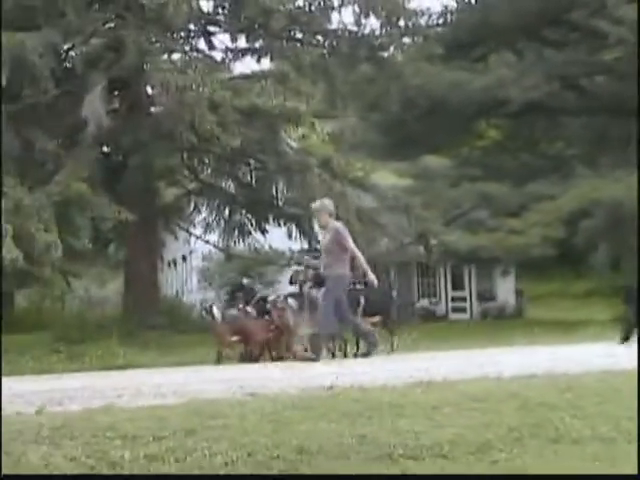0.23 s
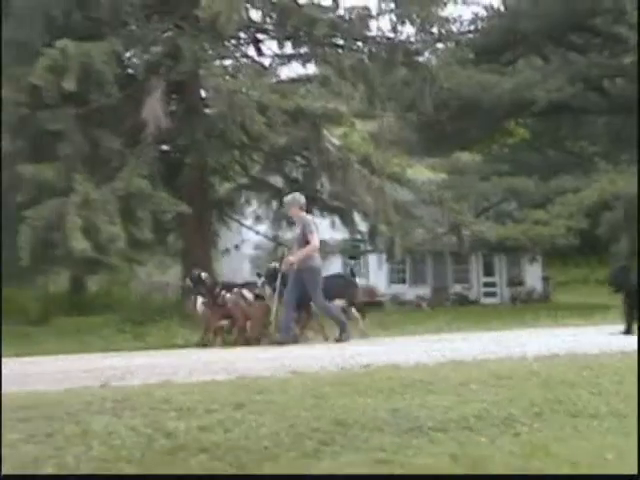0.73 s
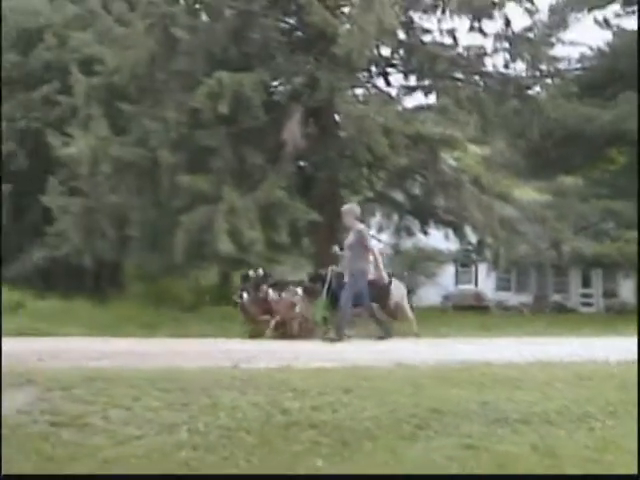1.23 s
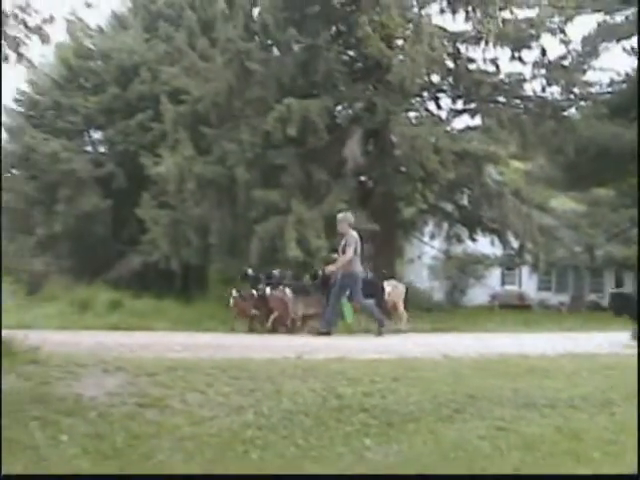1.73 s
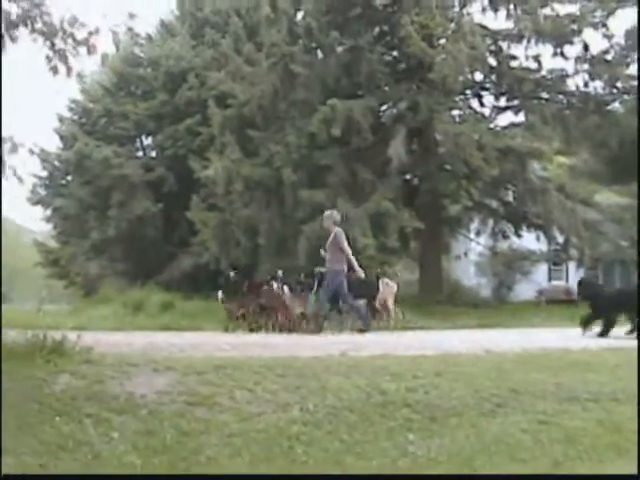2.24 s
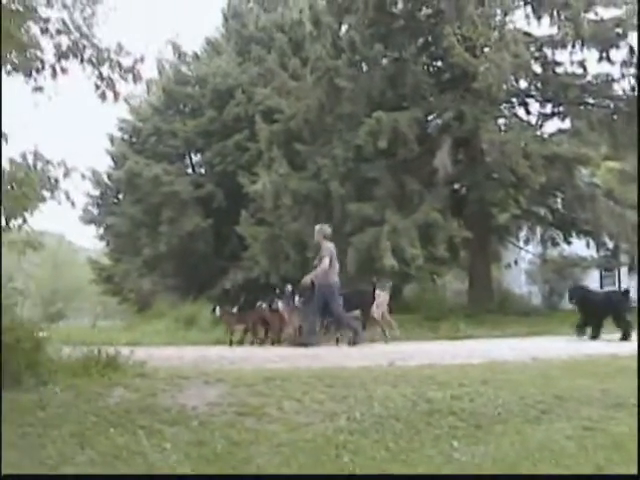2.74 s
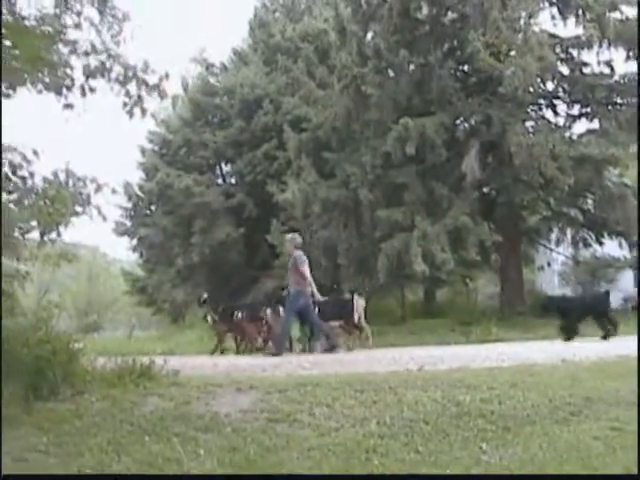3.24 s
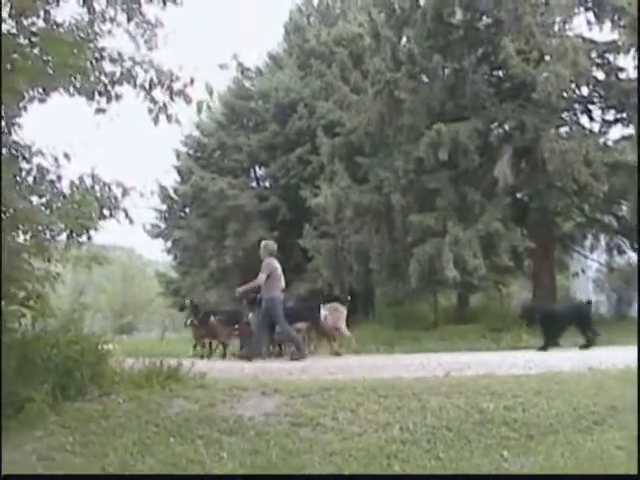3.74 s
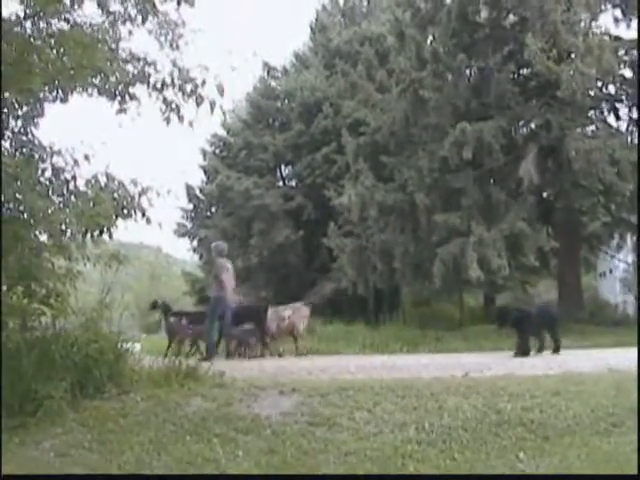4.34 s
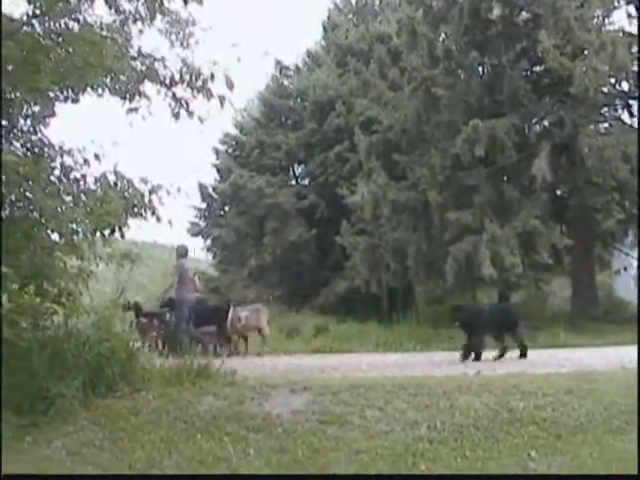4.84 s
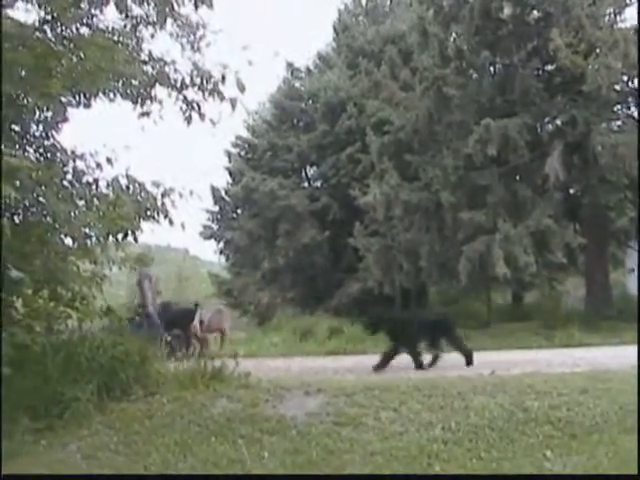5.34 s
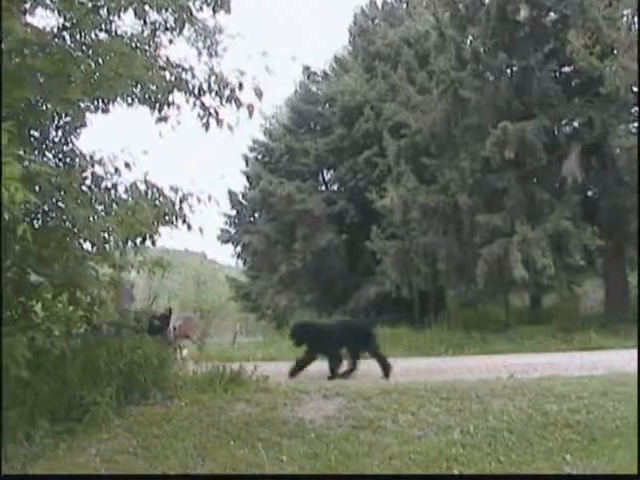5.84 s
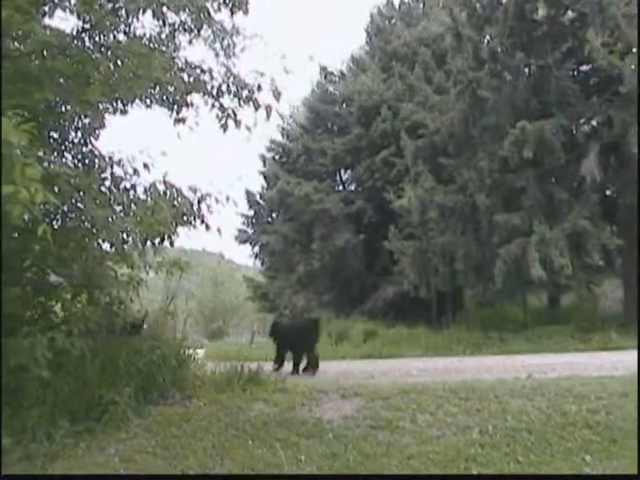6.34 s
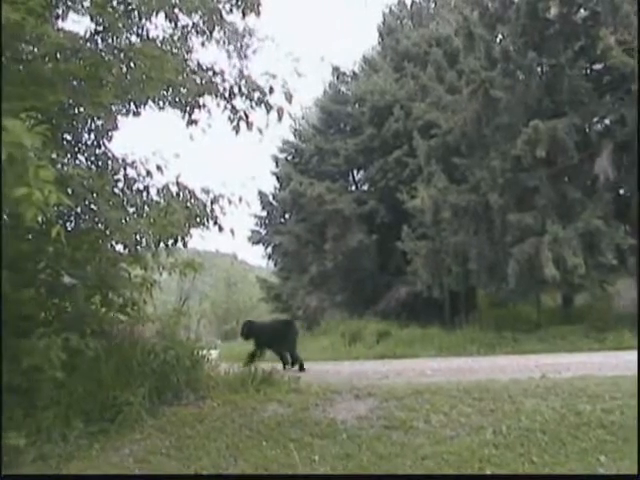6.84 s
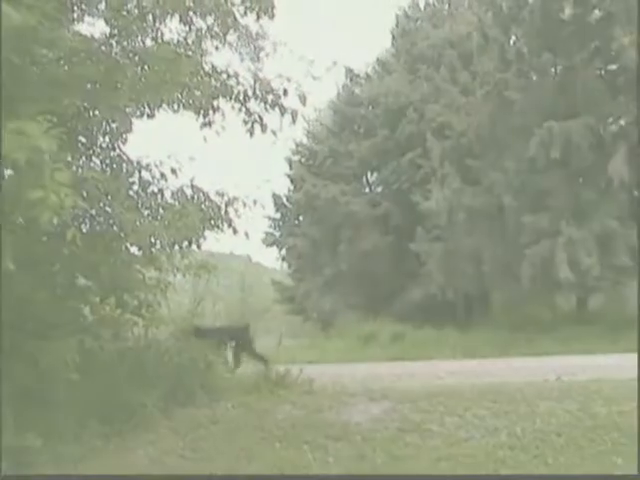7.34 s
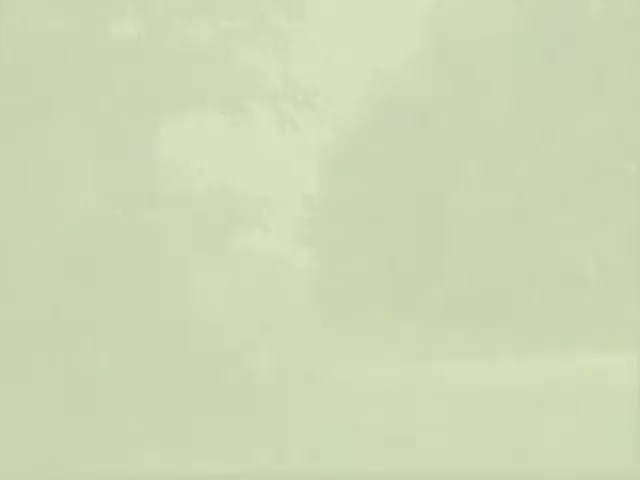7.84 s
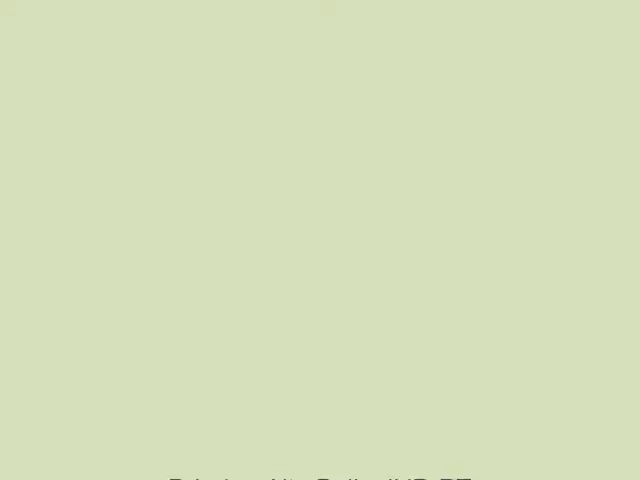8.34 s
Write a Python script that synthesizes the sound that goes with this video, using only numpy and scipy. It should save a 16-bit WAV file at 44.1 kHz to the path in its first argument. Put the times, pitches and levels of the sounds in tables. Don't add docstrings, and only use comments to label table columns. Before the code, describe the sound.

Small neck bells jingle and clank unevenly as a goat herd walks a gravel drive outdoors, with crunching steps, bird whistles and camera creaks.

```python
import sys
import numpy as np
from scipy import signal
from scipy.fft import rfft, irfft, next_fast_len
from scipy.io import wavfile
from scipy.ndimage import uniform_filter1d

SR = 44100
rng = np.random.default_rng(int(sys.argv[2]) if len(sys.argv) > 2 else 0)


def voltage_ratio(level):
    return 10 ** (np.asarray(level, float) / 20)


def dump(signal):
    limited = np.clip(np.atleast_2d(signal).T, -1, 1)
    pcm = np.round(limited * 32767).astype(np.int16)
    wavfile.write(sys.argv[1], SR, pcm)


N = 378800


def evened(x):
    return x / np.sqrt(np.mean(x ** 2) + 1e-20)


def read(points, hz):
    f, value = np.transpose(points)
    return np.interp(np.log(hz + 1), np.log(f + 1), value)


def follow(rows):
    return voltage_ratio(np.interp(np.arange(N) / SR, *np.transpose(rows)))


def surges(rows, rise_s):
    s, db, fade_s = np.transpose(rows)[:, :, None]
    t = np.arange(0, N, 64) / SR
    level_db = db - 20 * np.maximum((s - t) / rise_s, (t - s) / fade_s)
    return np.interp(np.arange(N) / SR, t, np.sqrt((voltage_ratio(level_db) ** 2).sum(0)))


def add(mix, s, sound):
    part = mix[round(s * SR):][:len(sound)]
    part += sound[:len(part)]


def ring(t, hz, t60, phase=0):
    return np.exp(-np.log(1000) / t60 * t) * np.sin(2 * np.pi * (hz * t + phase))


def onset(t, rise_s):
    return 1 - np.exp(-t / rise_s)


def hiss(points, likeness, patchy_db):
    hz = np.fft.rfftfreq(1024, 1 / SR)
    a, b, c, d, patches = rng.standard_normal((N // 256 + 5, 513, 5)).T
    patches = uniform_filter1d(uniform_filter1d(patches, size=12, axis=0), size=12, axis=1)
    same = np.clip(likeness(hz), -1, 1)[:, None]
    left = a + 1j * b
    right = same * left + np.sqrt(1 - same ** 2) * (c + 1j * d)
    z = np.array([left, right]) * voltage_ratio(read(points, hz)[:, None] + patchy_db * evened(patches))
    return evened(signal.istft(z, nperseg=1024, noverlap=768)[1][:, :N])


# (time [s], level [dB])
RUMBLE_LEVEL = [(0.0, -50.5), (0.18, -57), (0.52, -58), (1.1, -56), (2.37, -57.5), (2.76, -64.5),
                (3.42, -60), (4.09, -64), (4.28, -62.5), (6.11, -59.5), (7.04, -62.5), (7.89, -59)]
# (centre [Hz], width [Hz], level [dB])
RUMBLE_HUMPS = [(60.6, 92, -12.5), (148, 44, 4), (277, 52, 1), (423, 140, -9)]


def rumble():
    hz = np.geomspace(15, 3000, num=60)
    humps = sum(voltage_ratio(db) / (1 + (2 * (hz - f) / width) ** 2) for f, width, db in RUMBLE_HUMPS)
    colour = np.c_[hz, 20 * np.log10(humps)]
    return follow(RUMBLE_LEVEL) * hiss(colour, lambda f: .97 - 9.0 / (f + 10), patchy_db=2.5)


# (frequency [Hz], level per Hz [dB])
AIR_COLOUR = [(15, -52), (25, -21.5), (135, -5.5), (205, -20.5), (464, -7.5), (544, -9.5), (1780, -13.5),
              (2080, -10), (2710, -11), (3620, -16.5), (4350, -18), (11800, -35.5), (13500, -56.5)]
# (frequency [Hz], likeness [0-1])
AIR_LIKENESS = [(60, 1), (230, 0.6), (910, 0.82), (3520, 0.9), (13700, 0.74)]


def air():
    return voltage_ratio(-58) * hiss(AIR_COLOUR, lambda hz: read(AIR_LIKENESS, hz), patchy_db=3.3)


# (frequency [Hz], level [dB])
WHINE_COLOUR = [(300, -84.5), (1500, -77.5), (1800, -76.5), (3000, -81.5), (4500, -76), (6000, -78.5),
                (7000, -84), (10500, -125)]


def whine(drum_hz=299.67):
    turn = np.linspace(0, 1, num=4097)
    shape = np.zeros(len(turn))
    for k in range(1, 36):
        shape += voltage_ratio(read(WHINE_COLOUR, k * drum_hz) + 0.5) * np.sin(2 * np.pi * (k * turn + rng.random()))
    return np.interp(np.arange(N) / SR * drum_hz % 1, turn, shape)


def trees(x, t60=.4):
    taps = np.zeros((2, SR // 2))
    slots = np.arange(200, SR // 2 - 20, 20)
    at = slots + rng.integers(0, 20, (2, len(slots)))
    np.put_along_axis(taps, at, rng.choice([-1., 1.], at.shape), 1)
    taps = taps * voltage_ratio(-60 * np.arange(SR // 2) / SR / t60)
    return signal.fftconvolve(x[None], taps / np.linalg.norm(taps[0]), axes=1)[:, :N]


# (time [s], peak level [dB], pitch [Hz])
CREAKS = [(0.002, -41, 700), (0.245, -43, 807), (0.264, -38.5, 860), (0.282, -44, 935), (0.375, -31.5, 926),
          (0.38, -35, 775), (0.424, -28, 776), (0.502, -37, 755), (1.1155, -41, 300), (1.117, -30, 700),
          (1.146, -36, 800), (2.127, -32, 790), (2.161, -28.5, 764), (2.175, -33.5, 820),
          (2.208, -35.5, 810), (2.216, -30.5, 825), (2.232, -33.5, 790), (2.905, -46, 905),
          (2.976, -45, 680), (3.544, -40.5, 854), (3.973, -46.5, 920), (4.817, -46.5, 845),
          (4.958, -36, 1006), (5.105, -35, 1600), (5.13, -41.5, 1090), (5.237, -44, 1090), (5.66, -45, 720),
          (6.557, -44.5, 797), (7.6435, -29, 1750)]


def creaks():
    out, t = np.zeros(N), np.arange(2000) / SR
    for (s, db, hz), d in zip(CREAKS, rng.standard_normal((len(CREAKS), 2))):
        upper = .6 * ring(t, 1550 * (1 + .1 * d[0]), .016) + .45 * ring(t, 1150, .014, d[1])
        knock = ring(t, hz, 20 / hz) + min(hz / 800, 1) ** 3 * upper
        snap = uniform_filter1d(rng.standard_normal(len(t)), size=5) * voltage_ratio(-60 * t / 0.016)
        snap = snap - uniform_filter1d(snap, size=40)
        slip = min(1000 / hz, 1) ** 1.3 * knock + .6 * (hz / 1000) ** 2.1 * snap
        add(out, s + 0.0013, voltage_ratio(db + 1) * slip * onset(t, 0.00034))
    return out


# (start [s], length [s], from [Hz], to [Hz], level [dB])
CHIRPS = [(.425, .04, 4300, 3750, -59), (1.678, 0.072, 5900, 3840, -59), (3.404, 0.046, 3830, 6600, -54),
          (3.565, 0.069, 3800, 7200, -52), (3.753, 0.063, 3860, 7300, -53), (3.944, 0.054, 3750, 7330, -50),
          (4.131, 0.045, 4300, 6480, -49), (4.314, 0.049, 4400, 6280, -57), (4.918, 0.055, 5000, 4100, -55),
          (5.2, 0.025, 4200, 4800, -55), (5.222, .02, 4800, 4400, -57), (.51, .05, 2900, 3350, -60),
          (5.316, 0.089, 5700, 3840, -57), (5.405, .05, 3800, 2900, -60), (5.514, 0.027, 3350, 2710, -59),
          (5.575, 0.042, 3000, 4850, -59), (5.612, .012, 4850, 4450, -60), (5.62, .025, 2950, 3200, -60),
          (5.645, .035, 3850, 4850, -57), (5.675, .012, 4850, 4600, -59), (5.801, 0.045, 4950, 4100, -55),
          (5.845, 0.045, 3900, 2910, -59), (5.882, 0.09, 5800, 5250, -62), (6.075, 0.072, 2700, 3060, -49),
          (6.301, 0.079, 2700, 2250, -57), (7.827, .03, 5500, 6600, -66)]


def birds():
    out = np.zeros(N)
    for s, length, from_hz, to_hz, db in CHIRPS:
        hz = to_hz + (from_hz - to_hz) * np.linspace(1, 0, round(length * SR)) ** 1.25
        whistle = np.sin(2 * np.pi * np.cumsum(hz) / SR) * signal.windows.tukey(len(hz), .35)
        add(out, s, voltage_ratio(db) * (hz.min() / hz) ** 1.1 * whistle)
    flutter = evened(uniform_filter1d(rng.standard_normal(N), size=150))
    return out * (1 + 0.3 * flutter)


# (time [s], peak level [dB])
STONES = [(0.3292, -46), (0.63, -41), (0.8579, -46.5), (0.967, -42), (1.1165, -35), (1.13, -31),
          (1.1425, -24), (1.153, -29), (1.1625, -24), (1.177, -32), (1.197, -32), (1.207, -31),
          (1.215, -29), (1.254, -31), (1.268, -29), (1.29, -35), (1.3263, -46), (1.6122, -44), (2.008, -47),
          (2.3416, -45), (2.3611, -43), (2.4025, -45), (2.5212, -40), (2.682, -37), (2.742, -40),
          (2.76, -41), (2.775, -42), (2.865, -44), (2.98, -40), (3.0102, -34), (3.022, -34), (3.0596, -35),
          (3.068, -36), (3.174, -26), (3.19, -29), (3.225, -32), (3.245, -33), (3.74, -40), (4.16, -36),
          (4.205, -35), (4.32, -39), (4.425, -42), (4.835, -42), (3.683, -37.5), (4.151, -37),
          (4.1914, -34), (4.925, -43), (4.955, -43), (5.025, -45), (5.106, -45), (5.135, -43), (5.47, -50),
          (5.999, -42.5), (6.39, -53.5), (6.7027, -41), (6.7127, -33), (6.76, -42), (6.8414, -39),
          (6.9082, -44), (6.9586, -40), (6.9886, -40), (7.02, -42), (7.055, -39), (7.1208, -43),
          (7.175, -47), (7.645, -52)]


def turning_stones(t60=0.04):
    out, t = np.zeros(N), np.arange(SR // 4) / SR
    for s, db in STONES:
        add(out, s, voltage_ratio(db - 7.5 - 60 * t / t60) * onset(t, 0.0015))
    return out


# (time [s], level [dB], time to fade by 20 dB [s])
STEPS = [(.03, -62.5, 0.5), (.33, -61, 0.3), (.645, -57, .2), (.86, -62, 0.2), (.97, -61, 0.1),
         (1.16, -44, 0.2), (1.21, -45, .2), (1.28, -47, 0.06), (1.4, -71, 0.25), (1.62, -58.5, 0.1),
         (1.76, -62, 0.37), (2.03, -62, 0.2), (2.3, -58, 0.75), (2.64, -60, 0.6), (2.74, -54, 0.22),
         (2.92, -56, 0.5), (3.0, -54, 0.25), (3.18, -43, 0.26), (3.6, -60, .4), (3.72, -54, .13),
         (3.94, -64, 0.1), (4.14, -55, 0.4), (4.31, -53, .08), (4.41, -57, 0.18), (4.545, -58, .2),
         (4.83, -58, .1), (4.94, -58.5, .14), (5.135, -55, .25), (5.8, -70, 1.9), (6.71, -57.5, 0.7),
         (6.97, -55, 0.3), (7.03, -56, .15), (7.13, -60, .15), (7.67, -62, .2), (7.9, -64, .2)]
# (frequency [Hz], level per Hz [dB])
SCUFF_COLOUR = [(530, -39.5), (900, -21), (1990, -20.5), (2700, -12.5), (3670, -15), (4110, -14),
                (7750, -9.5), (10000, -13), (12300, -21), (13500, -31)]


def gravel(per_s=900, wash=0.8, lift_db=4, step_rise_s=.03, floor_db=-83.5):
    grains = voltage_ratio(3.0 * np.minimum(rng.exponential(1, N), 5)) * (rng.random(N) < per_s / SR)
    grains = signal.oaconvolve(grains, np.exp(-np.arange(200) / 100.0))[:N]
    grit = evened(wash + evened(grains))
    scuff = grit * (surges(STEPS, step_rise_s) + voltage_ratio(floor_db))
    noise = hiss(SCUFF_COLOUR, lambda hz: 0.9 + 0 * hz, patchy_db=1.5)
    return voltage_ratio(lift_db) * noise * np.hypot(scuff, turning_stones())


# (time [s], peak level [dB], pitch [Hz])
SLIT_BLOWS = [(0.6404, -43, 3430), (0.7791, -50, 3450), (0.9657, -45, 3460), (1.0294, -54, 3420),
              (2.3161, -44, 3430), (2.5132, -53, 3490), (2.6703, -47, 3430), (2.9262, -54, 3420),
              (3.5563, -50, 3430), (4.3121, -55, 3480), (4.5336, -57, 3440), (5.1332, -53, 3410),
              (6.6308, -56, 3490), (7.4175, -54, 3420)]


def slit_rings():
    out, t = np.zeros(N), np.arange(SR // 5) / SR
    for s, db, hz in SLIT_BLOWS:
        add(out, s, voltage_ratio(db + 1) * ring(t, hz, .35) * onset(t, .004))
    return out


# (time [s], peak level [dB])
RIM_BLOWS = [(0.0478, -50), (0.1136, -60), (0.2977, -52), (0.9852, -42), (1.1109, -50), (2.7272, -47),
             (3.1742, -44), (4.2009, -52)]


def rim_flares():
    out, t = np.zeros(N), np.arange(SR // 5) / SR
    flare = (ring(t, 13440, .06) + .5 * ring(t, 13700, .05)) * onset(t, .003)
    for s, db in RIM_BLOWS:
        add(out, s, voltage_ratio(db + 1) * flare)
    return out


# (time [s], peak level [dB])
CLATTER = [(.63, -30), (.648, -31), (.857, -32), (.89, -36), (3.96, -38), (4.42, -36), (4.59, -37),
           (5.21, -36), (2.296, -31), (2.383, -38), (2.87, -39), (3.472, -40), (4.66, -36), (4.815, -39),
           (5.25, -37), (5.919, -37), (6.185, -40), (6.454, -41)]


def clatter(spread_hz=170, t60=.04, gap_s=.008, step_db=-1.5):
    out, t = np.zeros(N), np.arange(3000) / SR
    for (s, db), d in zip(CLATTER, rng.standard_normal((len(CLATTER), 5, 2))):
        for k, (off, late) in enumerate(d):
            clink = ring(t, 2720 + spread_hz * off, t60) * onset(t, .001)
            add(out, s + gap_s * k * (1 + .2 * np.tanh(late)), voltage_ratio(db + step_db * k) * clink)
    return out


# (frequency [Hz], t60 [s])
SIDE_MODE = (3445, 0.36)
# (frequency [Hz], level [dB], t60 [s])
SHELL = [(6650, -4, .2), (7700, -2, .28), (7755, -3, .2), (12150, -11, .15), (12470, 1.5, .12),
         (12540, -1, .1), (12820, -6, .14), (13420, -13, .06)]
HERD_HZ = [2625, 2665, 2695, 2740, 2750, 2775, 2810]
# (time [s], level [dB], time to fade by 20 dB [s])
JOLTS = [(0.07, -39, .3), (.37, -36.5, 0.22), (.64, -39.5, .5), (.87, -41.5, .3), (1.0, -38, .5),
         (1.48, -45, 0.3), (1.78, -45, .37), (2.03, -45, 0.5), (2.34, -31, .13), (2.56, -46.5, 0.1),
         (2.69, -45.5, .23), (2.89, -39, 0.87), (3.47, -47.5, 1.1), (3.76, -46, 0.3), (3.93, -43, .15),
         (4.13, -42, .4), (4.25, -38, 0.13), (4.4, -45, .9), (4.94, -50.5, 0.5), (5.2, -38, .22),
         (5.96, -54.5, 1.6), (6.22, -55, 1.2), (6.47, -45.5, 0.1), (6.65, -47, 1.05), (7.02, -51, 1.5),
         (7.5, -51, 1.2), (7.62, -48, .5)]


def rattle(per_s=18, t60=.17, shell_db=-17, side_db=-21, rise_s=0.046):
    taps = voltage_ratio(2.8 * np.minimum(rng.exponential(1, N), 3)) * (rng.random(N) < per_s * len(HERD_HZ) / SR)
    bell, t = rng.integers(0, len(HERD_HZ), N), np.arange(SR // 5) / SR
    main, shell, side = np.zeros((3, N))
    for k, hz in enumerate(HERD_HZ):
        main += signal.oaconvolve(taps * (bell == k), ring(t, hz, t60) * onset(t, 0.00081))[:N]
    for k, cast in enumerate((.996, 1.0, 1.004)):
        hits = taps * (bell % 3 == k)
        shell_ring = sum(voltage_ratio(db) * ring(t, cast * hz, mode_t60) for hz, db, mode_t60 in SHELL)
        shell += signal.oaconvolve(hits, shell_ring)[:N]
        side += signal.oaconvolve(hits, ring(t, cast ** 2 * SIDE_MODE[0], SIDE_MODE[1]))[:N]
    layers = np.array([evened(main) + voltage_ratio(side_db) * evened(side), voltage_ratio(shell_db) * evened(shell)])
    return voltage_ratio(-2.5) * surges(JOLTS, rise_s) * layers


# (time [s], peak level [dB], shell partials [dB])
DEEP = [(.0454, -29.5, -15), (.5674, -41.5, -37), (.7764, -47, -5.5), (0.8913, -40, -29),
        (1.459, -35, -16.5), (2.583, -41, -14), (3.144, -40, -17), (3.2804, -43, -10), (3.462, -45, -15),
        (3.472, -33, -33), (3.7937, -37, -14.5), (4.3837, -36.5, -30), (4.405, -31, -22),
        (4.6412, -37, -32), (4.6683, -33, -17), (4.933, -40.5, -14), (4.9804, -32.5, -40),
        (6.165, -63, -10.5), (6.185, -36.5, -20), (7.163, -41, -20), (7.238, -44, -20)]
LOW = [(0.1046, -40, -21), (0.2853, -36, -14.5), (1.1914, -45, -20), (1.2114, -30, -12),
       (1.7657, -31.5, -27.5), (2.6697, -22, -21), (2.7727, -42, -33), (2.8682, -32, -18),
       (2.9853, -30, -29.5), (3.484, -35.5, -19), (4.1124, -38.5, -19), (4.1864, -34.5, -13.5),
       (4.9646, -41, -37), (5.802, -50, -12), (5.9194, -29.5, -29), (6.739, -37, -14.5), (6.808, -41, -18),
       (7.12, -43, -16), (7.141, -43, -20), (7.265, -43, -20), (7.3939, -54, -33.5), (7.4651, -40.5, -16)]
MIDDLE = [(0.3826, -29.5, -32), (.972, -27, -14), (1.0288, -21, -25), (1.611, -32, -16), (1.976, -36, -34),
          (2.297, -25.5, -17.5), (2.559, -37, -14), (2.938, -33.5, -11), (3.5518, -28, -17.5),
          (3.6263, -31, -19.5), (4.126, -35, -17), (4.4249, -30.5, -25), (4.5366, -26.5, -23.5),
          (4.8116, -34, -13), (5.961, -46, -36), (6.4715, -34, -18.5), (6.6285, -33.5, -18),
          (6.768, -37, -27), (7.012, -41, -22), (7.62, -39, -30), (7.4075, -30.5, -22.5),
          (7.6074, -38.5, -40), (7.665, -37.5, -20)]
SHRILL = [(0.256, -39, -34.5), (.328, -25, -17), (.629, -31, -11), (0.8577, -35, -9), (1.259, -36, -19),
          (1.9455, -50, -35.5), (2.0092, -31.5, -16.5), (2.0344, -32.5, -16), (2.051, -31.5, -25.5),
          (2.0882, -47, -27), (2.3196, -24, -16.5), (2.6349, -56, -3), (2.651, -35, -19.5),
          (2.726, -35, -15), (3.908, -43.5, -18), (3.964, -31, -20), (4.2483, -33, -12.5),
          (4.507, -34.5, -24), (4.577, -34.5, -22), (4.8224, -37.5, -22), (5.166, -31.5, -9),
          (5.182, -31, -20), (5.32, -44, -15), (2.383, -35, -20), (6.4539, -37, -23.5)]
# (frequency [Hz], t60 [s])
BELLS = [
    (2662, 0.18),
    (2706, 0.14),
    (2737, .15),
    (2768, .15),
]


def strikes(kept=.45, tick_db=-28, bounce_db=-13, pair_hz=43, pair_db=-9.5, side_db=-12):
    main, high, t = np.zeros(N), np.zeros(N), np.arange(SR // 6) / SR
    blows = sorted(row + bell for rows, bell in zip((DEEP, LOW, MIDDLE, SHRILL), BELLS) for row in rows)
    draws = rng.standard_normal((len(blows), 32))
    later = [row[0] for row in blows[1:]] + [N / SR]
    rise = 1 - np.exp(-(t / 0.003) ** 2)
    for (s, db, high_db, hz, t60), next_s, d in zip(blows, later, draws):
        choke = kept + (1 - kept) * np.exp(-np.maximum(t - (next_s - s), 0) / .004)
        split = pair_hz * np.sign(d[0]) * np.exp(0.2 * d[1])
        tone = ring(t, hz, t60) + voltage_ratio(pair_db + 2.5 * d[2]) * ring(t, hz + split, t60)
        add(main, s, voltage_ratio(db + 3.8) * tone * rise * choke)
        side = ring(t, SIDE_MODE[0] * (1 + 0.008 * d[3]), SIDE_MODE[1])
        add(high, s, voltage_ratio(db + high_db + side_db) * side * rise)
        for k in range(4):
            clink = ring(t[:3000], hz + 95 * d[20 + k], 0.07) * rise[:3000]
            clink_db = db + bounce_db - 2.5 * k + 2.5 * d[28 + k]
            add(main, s + .012 * k + .006 * abs(d[24 + k]), voltage_ratio(clink_db) * clink)
        shell = np.zeros(len(t))
        for k, (mode_hz, mode_db, mode_t60) in enumerate(SHELL):
            shell += voltage_ratio(mode_db + 3.6 * d[4 + k]) * ring(t, mode_hz * (1 + .004 * d[12 + k]), mode_t60)
        tick = voltage_ratio(tick_db - high_db - 60 * t / 0.02) * rng.standard_normal(len(t))
        add(high, s, voltage_ratio(db + high_db) * (shell * choke * onset(t, .006) + tick) * rise)
    return main, high


def scene():
    main, high = np.array(strikes()) + rattle()
    main = main + clatter() + slit_rings() + rim_flares()
    bird = birds()
    echoes = trees(voltage_ratio(-23.0) * main + voltage_ratio(-5.5) * high + voltage_ratio(-7) * bird)
    far = main + high + bird + echoes
    floor = air() + voltage_ratio(-0.5) * rumble() + whine()
    return far + gravel() + creaks() + floor


# (centre [Hz], width [Hz], depth [0-1])
DIPS = [(2060, 80, .6), (3680, 115, .7)]
# (frequency [Hz], left minus right [dB])
LEAN = [(60, -1), (180, 0), (530, -1.5), (1560, -0.5), (4620, 2), (13700, -1.0)]


def lean_and_tone(x):
    size = next_fast_len(N)
    hz = np.fft.rfftfreq(size, 1 / SR)
    notches = [1 - np.clip(depth, 0, 1) * np.exp(-((hz - f) / width) ** 4) for f, width, depth in DIPS]
    shelf = voltage_ratio(-6 / (1 + np.exp((13050 - hz) / 60.))) / np.sqrt(1 + (hz / 14000) ** 90)
    lean = voltage_ratio(read(LEAN, hz) * np.array([[.5], [-.5]]))
    return irfft(rfft(x, size) * np.prod(notches, axis=0) * shelf * lean, size)[:, :N]


# (centre [Hz], half width [Hz], level over their usual needed to pass [dB])
HOLES = [(2060, 75, .5), (3680, 105, 3.5), (3150, 60, -3), (4300, 90, -3.5), (5300, 70, -3.5),
         (9300, 90, -2.5), (11100, 100, -2)]


def thinned(x, quiet_db=-99, mask_db=-48, top_db=19):
    hz, _, z = signal.stft(x, SR, nperseg=1024, noverlap=768)
    power = (abs(z) ** 2).mean(0)
    power = uniform_filter1d(uniform_filter1d(power, size=4, axis=0), size=4, axis=1)
    tilt_db = top_db * (hz > 12900) - 6.0 * np.log2(np.maximum(hz / 5000, 1))
    limit = voltage_ratio(2 * tilt_db)[:, None] * (voltage_ratio(2 * quiet_db) + voltage_ratio(2 * mask_db) * power.max(0))
    for f, half_hz, pass_db in HOLES:
        band = abs(hz - f) < half_hz
        level = uniform_filter1d(power[band].mean(0), size=10)
        z[:, band] /= 1 + (voltage_ratio(2 * pass_db) * np.median(level) / (abs(level) + 1e-20)) ** 12
    z = z / (1 + (limit / (abs(power) + 1e-20)) ** 4)
    return signal.istft(z, nperseg=1024, noverlap=768)[1][:, :N]


def roll_off(x):
    return signal.sosfilt(signal.butter(12, 14280, fs=SR, output="sos"), x)


def record(dry):
    cut_s, gone_s, trail_db = 7.924, 7.975, -22
    times = [cut_s - .002, cut_s + .002, gone_s - .01, gone_s]
    gate = np.interp(np.arange(N) / SR, times, [1, voltage_ratio(trail_db), voltage_ratio(trail_db - 8), 0])
    mix = thinned(lean_and_tone(dry)) * gate
    return roll_off(mix)


dry = scene()
out = record(dry)
dump(out)
```